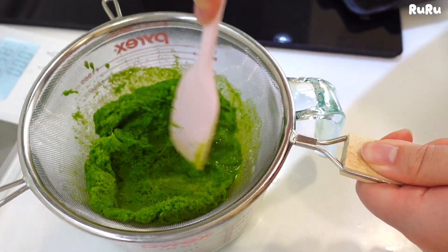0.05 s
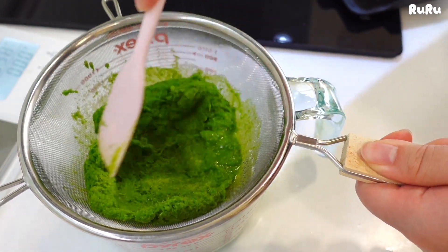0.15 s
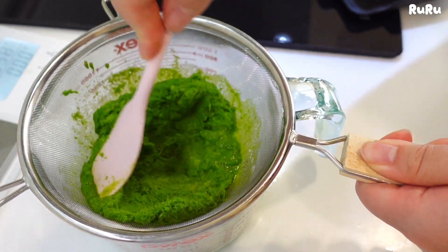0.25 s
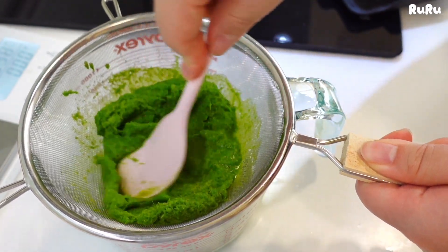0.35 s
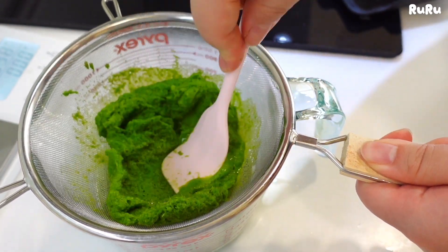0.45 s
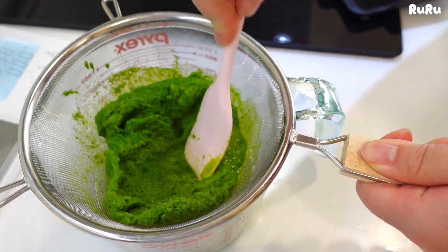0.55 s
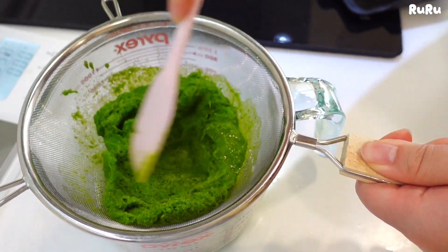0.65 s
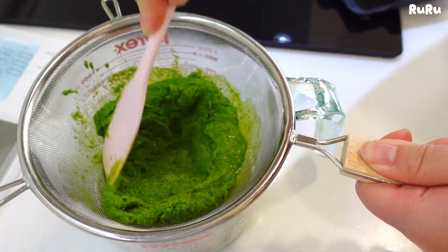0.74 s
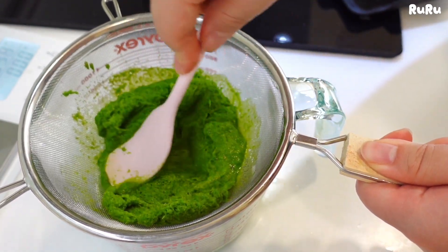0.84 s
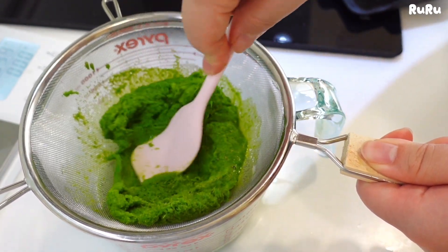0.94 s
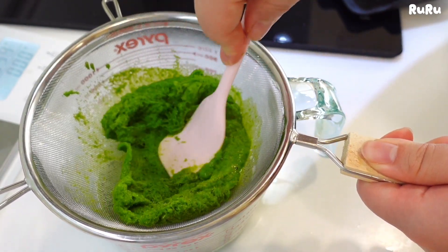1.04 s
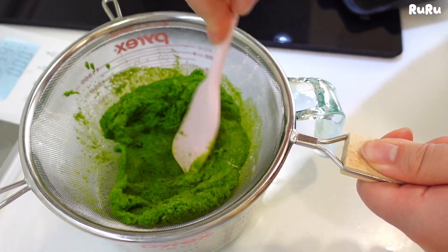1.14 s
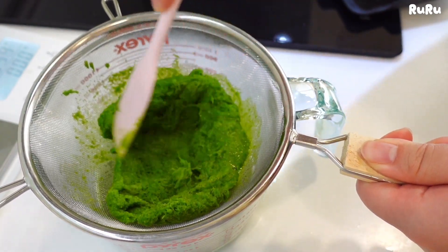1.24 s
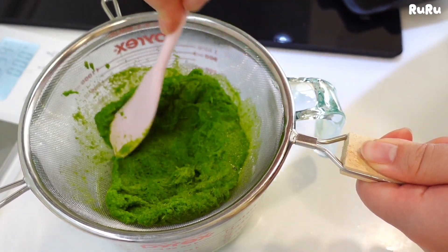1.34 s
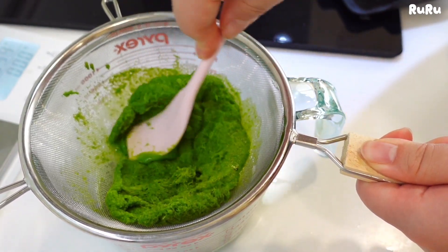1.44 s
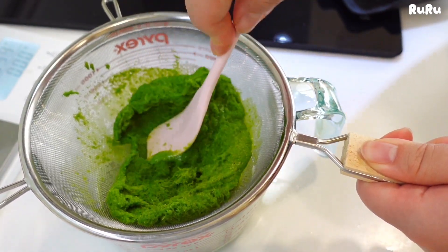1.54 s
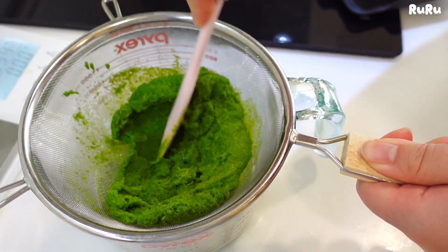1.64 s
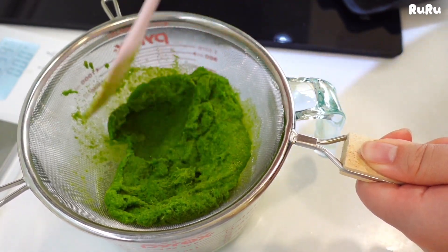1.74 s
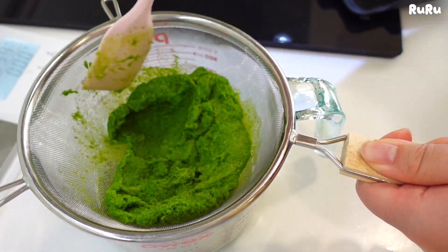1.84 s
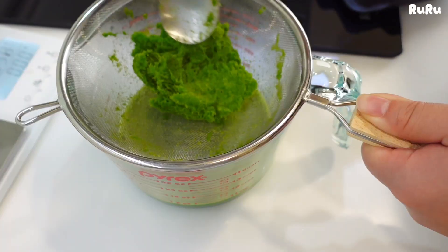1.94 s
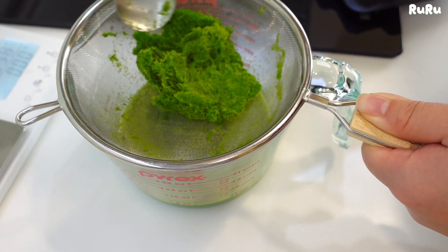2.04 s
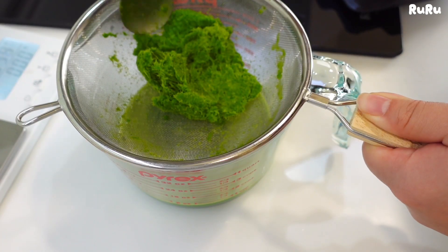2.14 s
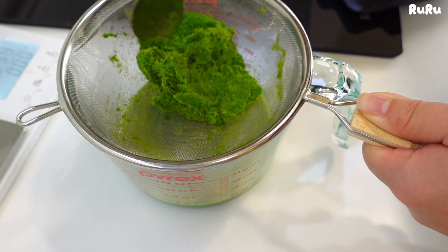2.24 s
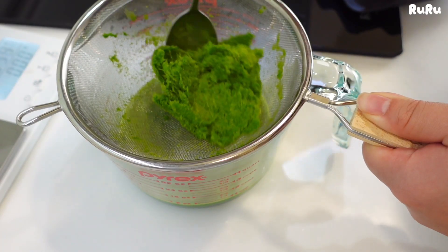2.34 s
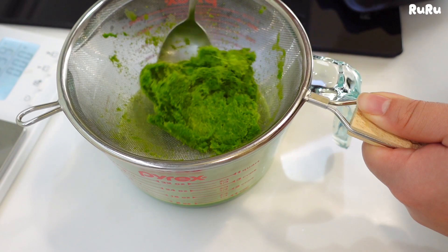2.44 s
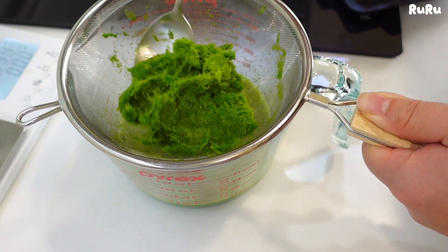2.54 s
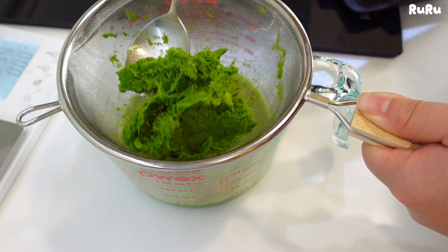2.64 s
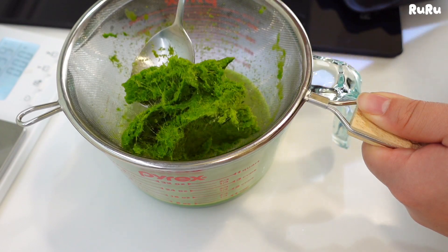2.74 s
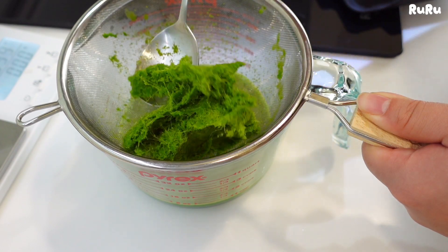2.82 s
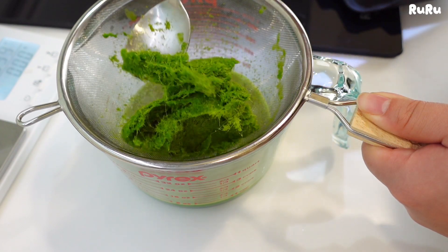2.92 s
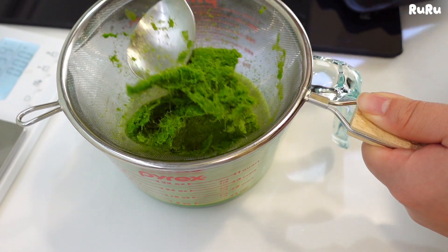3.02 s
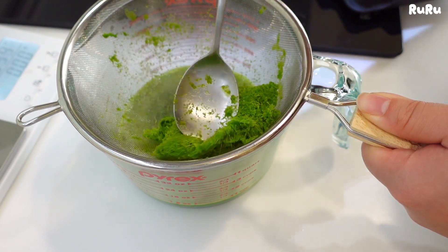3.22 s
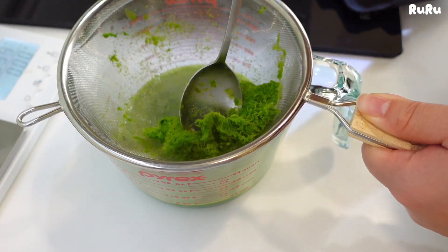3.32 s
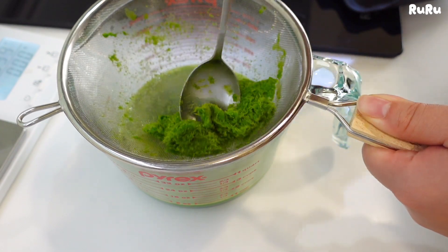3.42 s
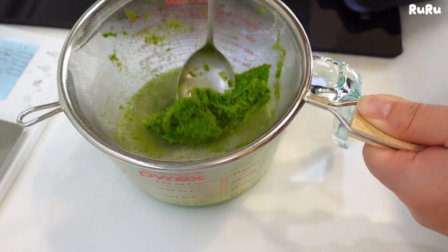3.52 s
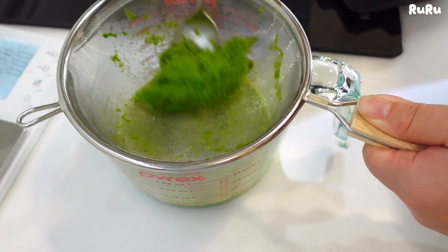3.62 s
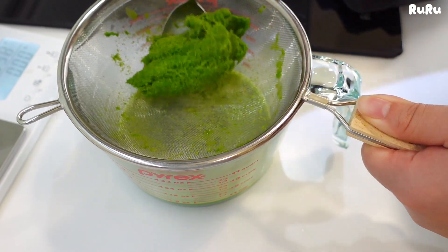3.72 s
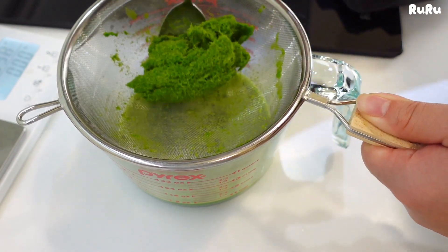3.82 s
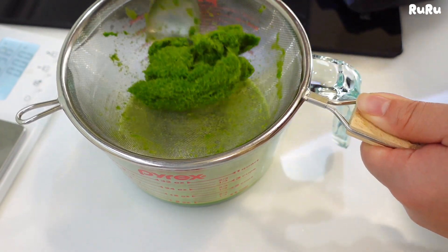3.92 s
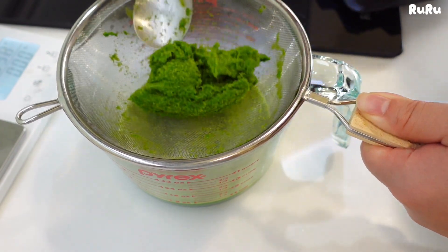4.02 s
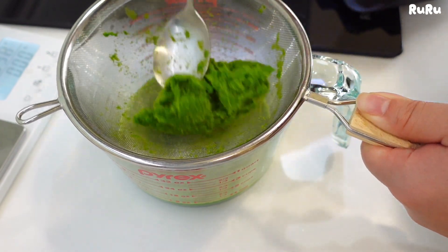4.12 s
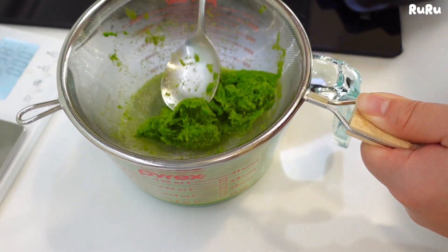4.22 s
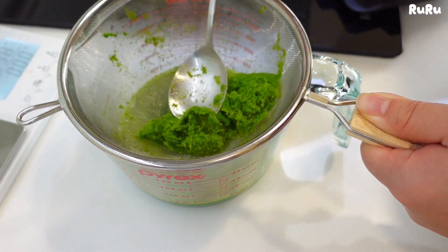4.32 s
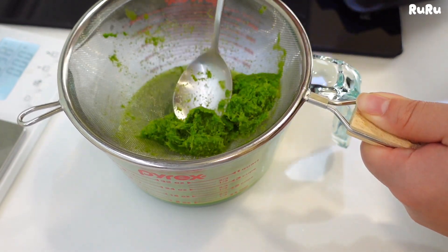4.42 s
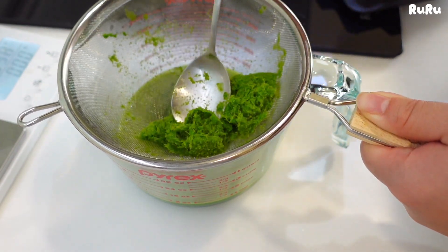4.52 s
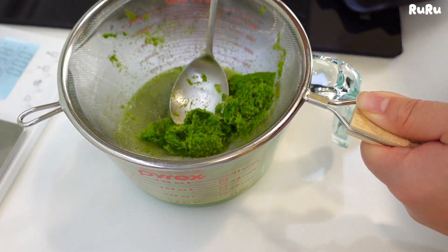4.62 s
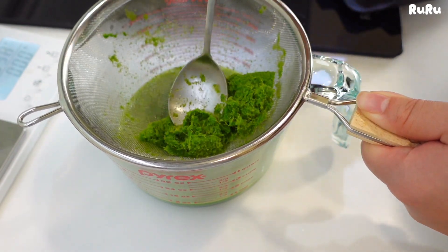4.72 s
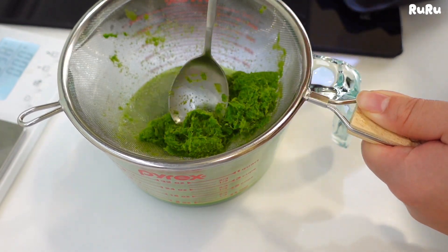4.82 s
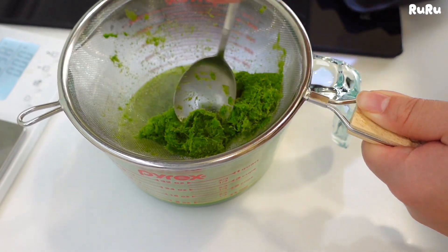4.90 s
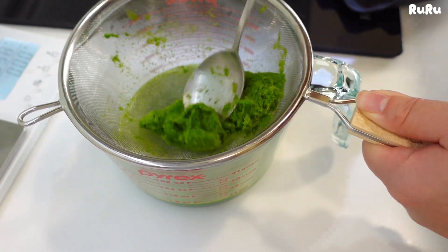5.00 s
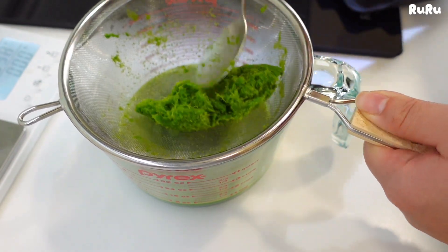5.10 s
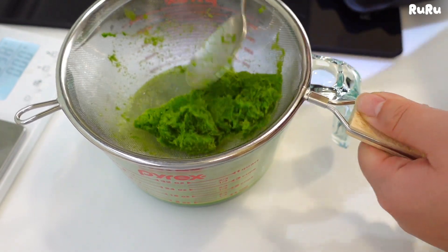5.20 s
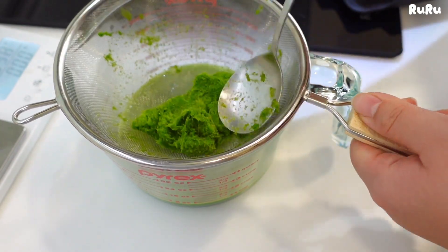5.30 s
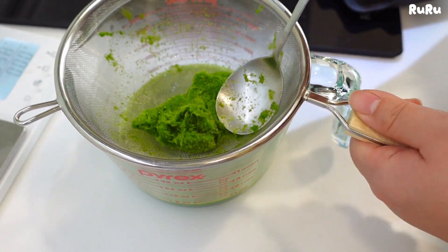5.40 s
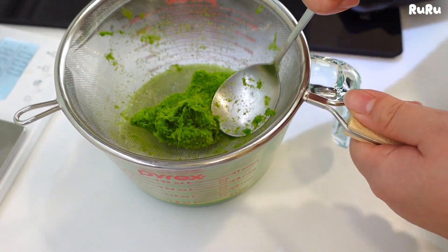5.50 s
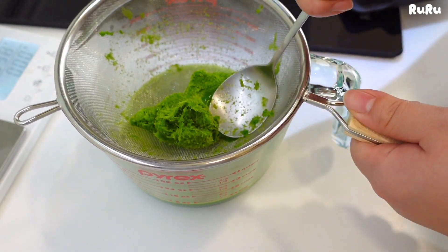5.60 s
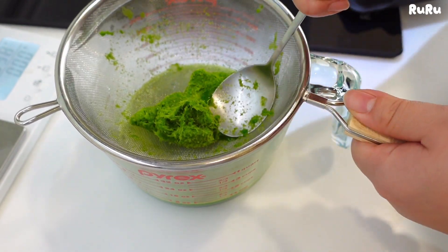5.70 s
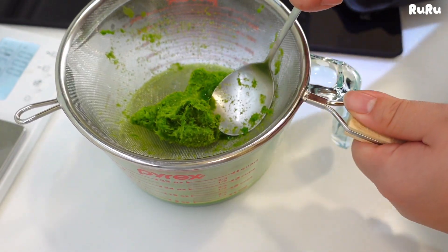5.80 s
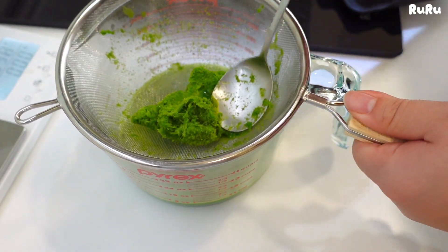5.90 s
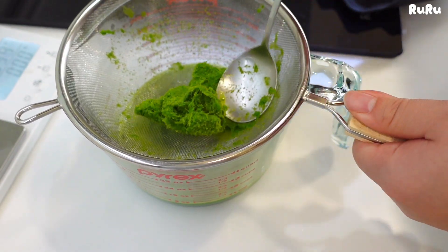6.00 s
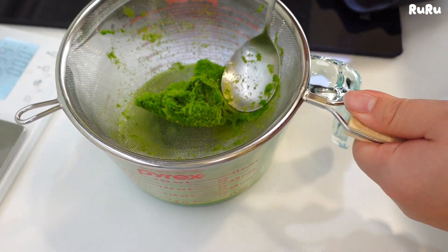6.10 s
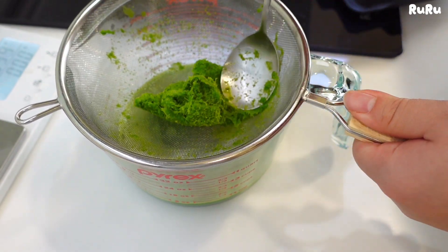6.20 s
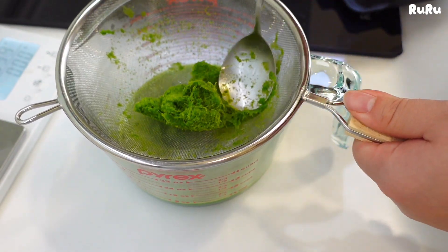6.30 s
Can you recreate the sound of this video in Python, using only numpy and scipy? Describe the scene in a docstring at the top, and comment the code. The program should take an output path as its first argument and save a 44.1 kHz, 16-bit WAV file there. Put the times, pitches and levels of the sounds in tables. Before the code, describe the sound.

Over the steady, faint hum of a kitchen fan, wet pulp crackles and pops close by as a spatula pushes it against a metal sieve. A spoon takes over with a short, sharp scrape on the mesh. Midway it hits the rim once, loudly, with a thud from the glass jug underneath. It then works on through the pulp with softer pops, scrapes and taps, in slight room echo.

```python
"""A kitchen fan drones while wet leaf pulp is stirred in a wire sieve over a glass jug.
First a soft spatula squeezes it: bubbles squelch, air pockets pop, frame and jug rumble under the push.
After 2 s a steel spoon takes over, rasps across bare mesh and, at 3.7 s, knocks hard on the frame.
It works on through the pulp with more pops, lighter scrapes and taps, easing off around 6 s."""
import sys
import numpy as np
from scipy import signal
from scipy.fft import rfft, irfft
from scipy.io import wavfile

SR = 44100
rng = np.random.default_rng(int(sys.argv[2]) if len(sys.argv) > 2 else 0)


def unload_audio(sound):
    """Save the sound as a 16-bit wav file, at the path given as the first command line argument."""
    columns = np.transpose(np.atleast_2d(sound))
    # keep every value between -1 and 1, then stretch to whole-number steps
    steps = np.round(np.clip(columns, -1, 1) * 32767)
    wavfile.write(sys.argv[1], SR, steps.astype(np.int16))


N = 280035
BINS_HZ = np.maximum(np.fft.rfftfreq(N, 1 / SR), 1)
PAN = np.array([[.5], [-.5]])   # shares a left-minus-right dB between the sides


def from_db(db):
    return 10 ** (np.asarray(db) / 20)


def unit_rms(x):
    return x / np.sqrt(np.mean(x ** 2) + 1e-20)


def at_hz(curve, hz):
    curve_hz, values = np.transpose(curve)
    return np.interp(np.log(hz), np.log(curve_hz), values)


def colour(x, spectrum):
    """EQs x with an (f/Hz, level/dB) curve; rms 1."""
    return unit_rms(irfft(rfft(x) * from_db(at_hz(spectrum, BINS_HZ)), N))


def butter(x, hz, kind="band", order=2):
    return signal.sosfilt(signal.butter(order, hz, kind, fs=SR, output="sos"), x)


def split(x, hz):
    """Crossover: the parts below and above hz."""
    return [butter(x, hz, kind, order=4) for kind in ("low", "high")]


def ring(x, hz, t60):
    """Resonator: a unit click sets a sine of height 1 ringing."""
    r, w = from_db(-60 / (t60 * SR)), 2 * np.pi * hz / SR
    return signal.lfilter([0, np.sin(w)], [1, -2 * r * np.cos(w), r * r], x + 1e-18)


def t60_of(width_hz):
    return np.log(1000) / (np.pi * width_hz)


def drift(rate_hz):
    """Random modulator: twice low-passed noise, rms 1."""
    r = np.exp(-2 * np.pi * rate_hz * 40 / SR)   # one step per 40 samples
    slow = signal.lfilter([1], [1, -2 * r, r * r], rng.standard_normal(N // 40 + 2002))[2000:]
    return np.interp(np.arange(N) / 40, np.arange(len(slow)), unit_rms(slow))


def swells(start_s, rise_s, hold_s, fall_s, db, edge_db=28):
    """Envelope of gestures that rise from edge_db under their top, hold and die away."""
    t = np.arange(0, N + 40, 40)[:, None] / SR
    early = np.maximum(1 - (t - start_s) / rise_s, 0)
    late = np.maximum((t - start_s - rise_s - hold_s) / fall_s, 0)
    power = from_db(2 * np.maximum(db - edge_db * (early ** 2 + late), -150))
    return np.interp(np.arange(N) / SR, t[:, 0], np.sqrt(power.sum(axis=1)))


def grains(per_s, spread_db, scatter_db):
    """Random clicks of uneven size, each with its own pan."""
    sizes = from_db(spread_db * np.minimum(rng.exponential(1, N), 5)) * rng.choice([-1, 1], N)
    pans = from_db(scatter_db * rng.standard_normal(N) * PAN)
    return sizes * pans * (rng.random(N) < per_s / SR)


def smear(x, lags_s):
    """All-pass delays spread a click in time without colouring it."""
    for lag in (lags_s * SR).astype(int):
        taps = np.zeros(lag + 1)
        taps[[0, lag]] = -.62, 1
        x = signal.lfilter(taps, taps[::-1], x)
    return x


# EQ of the moving air: f/Hz, level/dB
FAN_AIR = [(18, -43), (30, -55), (93, -19), (130, -11.5), (165, 2), (264, -4), (293, -13.5), (423, -3),
           (643, -3), (1030, -6), (1270, -7.5), (2640, -13.5), (4710, -17.5), (15700, -29.5)]
# hollow housing tones: f/Hz, width/Hz, level/dB
FAN_TONES = [(178, 34, -4.5), (312.5, 20, -8.5), (643.3, 16.5, -12), (1250, 120, -25.5), (1957, 22, -13)]
# stereo image of the fan: f/Hz, left-right correlation
FAN_IMAGE = [(60, 1), (240, 0.77), (950, 0.019), (3770, 0.013), (15000, 0.51)]


def fan(level_db=-58):
    """A bed of air noise rings the housing and wavers slightly; centred bass, wide mids."""
    white = rng.standard_normal((2, N))
    tones = sum(from_db(db) * unit_rms(ring(white, hz, t60_of(width))) for hz, width, db in FAN_TONES)
    mid, side = colour(white[::-1], FAN_AIR) + 0.93 * tones
    alike = at_hz(FAN_IMAGE, BINS_HZ)
    mid = irfft(rfft(mid) * np.sqrt(1 + alike), N)
    side = irfft(rfft(side) * np.sqrt(1 - alike), N)
    return from_db(level_db + 1.84 * drift(7.4)) * unit_rms(np.array([mid + side, mid - side]))


# tool leaning on the frame: start t/s, hold/s, level/dB
PUSH_CUES = [(-.1, 0.7, -56.5), (0.718, 0.35, -59.5), (1.05, 0.447, -57.5), (1.42, 0.017, -50.5),
             (1.66, 0.049, -56), (1.813, 0.022, -49.5), (2.14, .05, -61), (2.253, 0.046, -47),
             (2.99, 0.018, -82), (3.174, 0.85, -63), (3.92, 1.3, -66), (5.23, 0.16, -56), (5.456, .02, -49),
             (5.714, .08, -55.5), (6.057, 0.045, -76)]
# EQ of frame and jug under load: f/Hz, level/dB
RUMBLE_EQ = [(50, -43), (100, -3), (135, -14.5), (172, 9), (225, -6), (314, -4), (400, -8), (560, -8),
             (680, -3), (820, -12), (1400, -24.5), (1680, -13.5), (2100, -21.5), (3000, -74)]


def rumble(rise_s=0.049, fall_s=0.1):
    """Each push draws a low, fluttering rumble from frame and jug."""
    start_s, hold_s, db = np.transpose(PUSH_CUES)
    body = colour(rng.standard_normal(N), RUMBLE_EQ)
    return body * swells(start_s, rise_s, hold_s, fall_s, db) * from_db(2.45 * drift(35))


# pulp squeezed under the tool: wettest t/s, length/s, level/dB, top-end trim/dB
SQUEEZE_CUES = [(0.065, 0.27, -56.5, -8.5), (0.176, 0.13, -60.5, -8), (0.3, 0.21, -61.5, -5),
                (0.394, 0.15, -52, -7), (0.454, 0.15, -47.5, -7), (0.643, 0.3, -52.5, -9),
                (0.818, 0.11, -58, -7), (0.872, 0.24, -57.5, -5), (1.018, 1, -59, -6),
                (1.197, 0.095, -54.5, -1.5), (1.38, 0.6, -62, -3.5), (1.49, 0.16, -58.5, 3.5),
                (1.581, 0.28, -63, -1.5), (1.672, .1, -52.5, -9), (1.709, 0.11, -59.5, -1.5),
                (1.91, 0.31, -65, -2.5), (3.193, 0.3, -72, 3.5), (3.425, 0.39, -61.5, -4.5),
                (3.615, 0.5, -66, 3), (4.022, 0.31, -59, -16), (4.226, 0.6, -65, -10),
                (4.363, 0.29, -65, 1), (4.439, 0.043, -51.5, 1.5), (4.54, 0.77, -61, -5),
                (4.873, 0.34, -57, -1), (5.063, 0.76, -56.5, -6.5), (5.283, 0.68, -63, -14),
                (5.697, 0.88, -61.5, -14), (5.927, 0.19, -77, -24), (6.143, 1, -68, -8)]
# EQ of the wet pulp: f/Hz, level/dB
SQUELCH_EQ = [(590, -55), (1000, -39), (1240, -12), (1660, -1.5), (1790, -7), (4240, -0.5), (4760, -2.5),
              (8740, -5), (15500, -18)]


def squelch():
    """Tiny bubbles crackle in clumps with each squeeze, each ringing a few cycles."""
    s, length_s, db, top_db = np.transpose(SQUEEZE_CUES)
    rise_s = 0.41 * length_s
    clicks = grains(7000 * from_db(4 * drift(18)), spread_db=2, scatter_db=8)
    pitches = np.geomspace(1200, 14000, 12)
    pitch_index = rng.integers(0, len(pitches), N)
    fizz = sum(ring(clicks * (pitch_index == k), hz, 6 / hz) * np.sqrt(hz)
               for k, hz in enumerate(pitches))
    low, top = split(colour(fizz, SQUELCH_EQ), 6000)
    return sum(swells(s - rise_s, rise_s, 0, length_s - rise_s, level_db) * unit_rms(part)
               for part, level_db in ((low, db), (top, db + top_db)))


# air pockets bursting: t/s, level/dB, f/Hz, snap over tone/dB, left minus right/dB
POP_CUES = [(.0148, -40.5, 3330, -0.5, 3), (0.0486, -49, 1610, 0, -.5), (.134, -45.5, 3840, 7.5, -1),
            (.171, -43.5, 1830, 10.5, -2), (0.5221, -34.5, 1472, 6, 1.5), (.612, -38, 3300, -4, 0),
            (0.6612, -41, 2100, 10, 3), (0.6652, -38.5, 3420, 7, .5), (0.7154, -30, 3020, 3, 3),
            (.731, -40.5, 3050, 7, .5), (.8996, -42, 3390, 10, 1), (0.942, -40, 4060, 6, -.5),
            (1.029, -32.5, 3050, -8, 3), (1.1283, -44, 3250, 3, .5), (1.1785, -45.5, 4140, 12, 0),
            (1.3612, -40, 5030, 1, 0), (1.479, -47.5, 1470, 1, -5), (1.5487, -42, 3060, 6, 1),
            (1.6403, -44.5, 1850, 12, 1), (1.6634, -45.5, 2500, 14, -.5), (1.859, -49, 4970, 2, 0),
            (1.8984, -50.5, 1180, 10, .5), (2.797, -56.5, 5500, 8, 0), (4.4326, -41.5, 7740, 10, 4),
            (4.8475, -40, 3500, 9, -4), (4.9, -47.5, 3030, 8, -2), (4.922, -46, 4230, 11, -4),
            (4.952, -47, 3120, 1, -2), (4.9993, -52, 4700, 4, -6), (5.208, -43.5, 2700, 4, -5),
            (5.8465, -44, 1910, 3, -2)]


def pops(t60_cycles=62, snap_t60_s=.008, samples=4000):
    """Each pocket gives a short tone, rising a little as it closes, and a broad snap."""
    out, t = np.zeros((2, N + samples)), np.arange(samples) / SR
    for s, db, hz, snap_db, pan_db in POP_CUES:
        burst = rng.standard_normal(samples) * from_db(-60 * t / snap_t60_s)
        snap = butter(burst, [1.13 * hz, min(2.06 * hz, 12000)])   # small pockets snap brighter
        tone = np.sin(2 * np.pi * hz * t * (1 + t)) * from_db(-60 * t * hz / t60_cycles)
        start = round(s * SR)
        out[:, start:start + samples] += from_db(db + PAN * pan_db) * (tone + from_db(snap_db) * snap)
    return out[:, :N]


# metallic ring of spoon and sieve: f/Hz, width/Hz, relative level under steady rubbing/dB
STEEL_MODES = [(319, 14, 4), (870, 25, -6), (986, 22, 0), (1639, 30, -4), (2105, 25, -3), (2500, 40, -6),
               (2944, 25, -3), (3135, 16, 0), (3680, 25, -2), (4298, 18, 2), (5100, 24, 0), (5338, 12, -7),
               (6070, 18, -8), (6430, 90, -9), (6880, 70, -10), (7310, 35, -10), (7520, 25, -6),
               (8060, 40, -13), (8960, 70, -14), (9680, 90, -15)]


def steel(x):
    """Spoon and sieve ring at their modes when struck or rubbed."""
    modes = sum(from_db(db) * width / 100 * ring(x, hz, t60_of(width)) * (-1) ** k
                for k, (hz, width, db) in enumerate(STEEL_MODES))
    return butter(modes, 150, "high", order=4)


# tool hitting the frame: t/s, clink drive/dB, thud drive/dB
KNOCK_CUES = [(1.8361, -49, -45.5), (2.1538, -50, -44), (3.6817, -14.5, -22), (3.7435, -56, -31.5),
              (5.332, -45, -48), (5.484, -37, -62)]
# body of jug and worktop: f/Hz, relative level/dB, t60/s
THUD_MODES = [(65, -12, 0.06), (110, -7.5, 0.068), (169, 0, 0.15), (265, 0.5, 0.04), (334, -6, 0.11),
              (476, 7, 0.029), (715, 5, 0.015), (860, -3, 0.038), (1160, -9.5, 0.044)]


def knocks():
    """A blow rings the steel, cracks through the wires and shudders on in jug and worktop."""
    hard, soft = np.full((2, N), 1e-18)
    for s, clink_db, thud_db in KNOCK_CUES:
        hard[round(s * SR)] = from_db(clink_db)
        soft[round((s + .001) * SR)] = from_db(thud_db)
    chatter = smear(hard, np.geomspace(.00015, .0012, 6) * rng.uniform(.85, 1.3, 6))
    crack = butter(chatter, [800, 9000])
    slow = signal.resample_poly(soft, 1, 10)   # at a tenth of the rate, lags last ten times as long
    slow = smear(slow, np.geomspace(.00006, .0007, 5) * rng.uniform(.85, 1.15, 5))
    shudder = signal.resample_poly(slow, 10, 1)[:N]
    thud = sum(from_db(db - 4.5) * ring(shudder, hz, t60) * (-1) ** k
               for k, (hz, db, t60) in enumerate(THUD_MODES))
    return from_db(-10) * steel(chatter) + from_db(18) * crack + thud


# spoon on bare mesh: t/s, attack/s, hold/s, release/s, level/dB, low-end trim/dB, top-end trim/dB
SCRAPE_CUES = [(2.15, .003, 0.031, .045, -57, -28, 3.5), (2.272, .004, 0.009, .03, -50, -5, -6),
               (2.267, 0.075, 0.034, 0.013, -29.5, 3.5, -3.5), (3.625, 0.012, .01, .01, -53.5, -20, 1),
               (3.646, 0.0037, 0.039, 0.0069, -46.5, -3, 4),
               (3.896, 0.0036, 0.0055, 0.06, -51.5, 0.5, -6.5),
               (5.17, 0.082, 0.034, 0.13, -50, -7.5, -12.5), (5.33, 0.018, 0.14, .02, -59.5, -11, -10),
               (5.479, 0.0027, .004, 0.076, -42, 0.5, -13)]
# EQ of the rasping wires: f/Hz, level/dB
MESH_EQ = [(120, -50), (200, -14), (320, -9.5), (900, 1.5), (1300, -0.5), (2300, -0.5), (4400, 2),
           (8000, 2), (11500, -4.5), (16000, -14)]


def rasp(low_release_ratio=2.26):
    """The spoon edge catches wire after wire: dense clicks from the mesh and through the steel."""
    s, attack_s, hold_s, release_s, db, low_db, top_db = np.transpose(SCRAPE_CUES)
    # a light touch moves little bass; pulp under the edge dulls the top
    low_gain = swells(s, attack_s, hold_s, release_s * low_release_ratio, db + low_db)
    mid_gain = swells(s, attack_s, hold_s, release_s, db)
    top_gain = swells(s, attack_s, hold_s, release_s, db + top_db)

    def stroked(x):
        low, rest = split(x, 2200)
        mid, top = split(rest, 5600)
        return low_gain * low + mid_gain * mid + top_gain * top
    catches = unit_rms(grains(4000, spread_db=4, scatter_db=0.5))
    ringing = steel(stroked(catches)) / np.std(steel(catches))
    wires = colour(grains(6000, spread_db=0, scatter_db=5.5), MESH_EQ)
    return from_db(-3.2) * ringing + from_db(-2) * stroked(wires)


# reverb time of the kitchen: f/Hz, t60/s
ROOM_DECAY = [(200, 0.92), (1000, 0.75), (4000, 0.77), (12000, 0.55)]


def kitchen(x):
    """Wall echoes as a noise tail that dies octave by octave, wider above the bass."""
    t, tail = np.arange(SR) / SR, 0
    for low_hz in 45 * 2. ** np.arange(9):
        centre, *sides = butter(rng.standard_normal((3, SR)), [low_hz, min(2 * low_hz, 20000)])
        band = centre + 0.82 * min(low_hz / 500, 1) * np.array(sides)
        tail += band * from_db(-60 * t / at_hz(ROOM_DECAY, low_hz * np.sqrt(2)))
    tail *= np.clip((t - .003) / 0.00053, 0, 1)   # pre-delay to the first walls
    return signal.fftconvolve(x[None], tail / np.sqrt(np.sum(tail ** 2) / 2), axes=1)[:, :N]


def scene(spoon_from_s=2.05, spoon_pan_db=-1.5):
    """The sieve and its reverb over the fan; the spoon stirs a little to the right."""
    pan_db = spoon_pan_db * (np.arange(N) / SR > spoon_from_s)
    stirring = (squelch() + rumble()) * from_db(PAN * pan_db)
    sieve = stirring + rasp() + knocks() + pops()
    return sieve + from_db(-10) * kitchen(sieve.mean(axis=0)) + fan()


def record(dry, cutoff_hz=16200):
    """The microphone drops the deep bass; the top is cut."""
    thin = butter(dry, 45, "high", order=6)
    return signal.sosfilt(signal.cheby2(20, 70, cutoff_hz, fs=SR, output="sos"), thin)


dry = scene()
out = record(dry)
unload_audio(out)
```